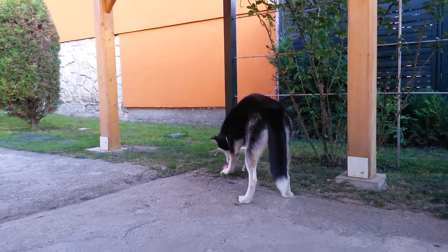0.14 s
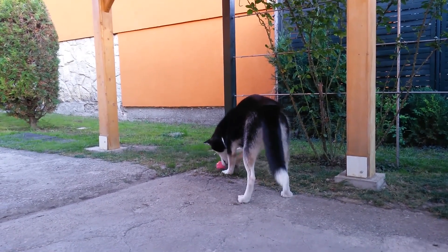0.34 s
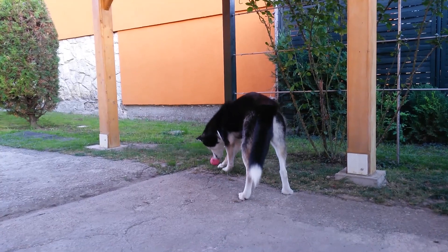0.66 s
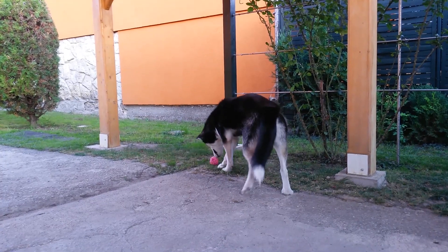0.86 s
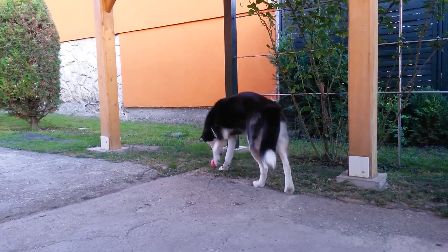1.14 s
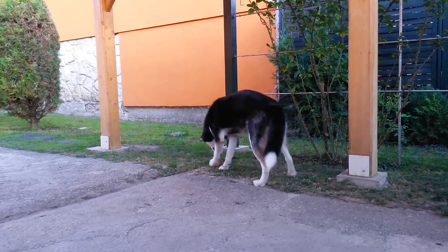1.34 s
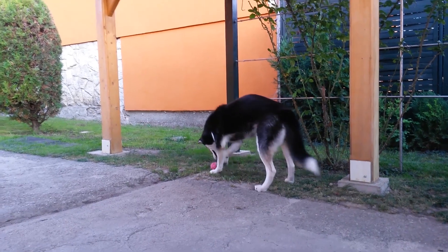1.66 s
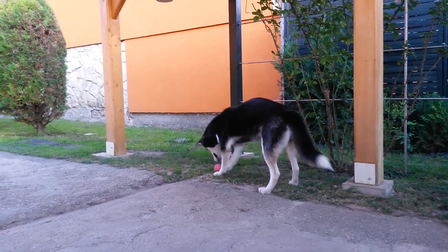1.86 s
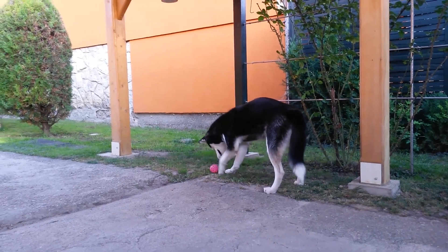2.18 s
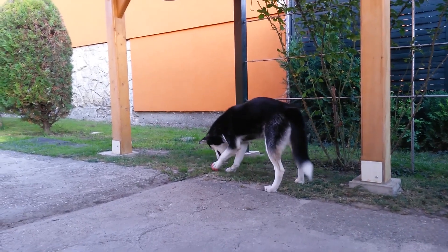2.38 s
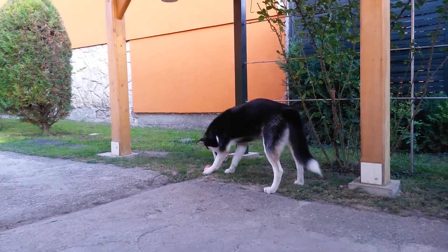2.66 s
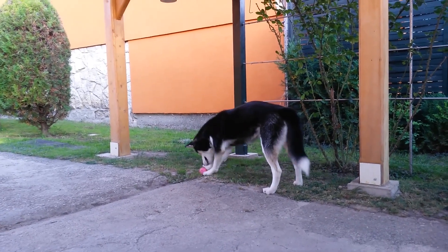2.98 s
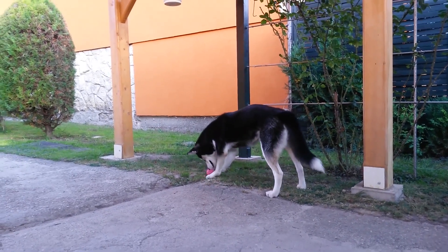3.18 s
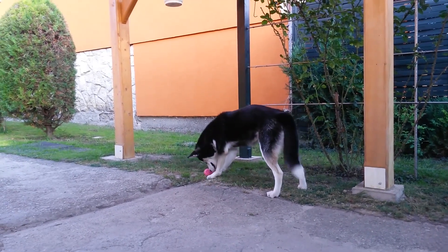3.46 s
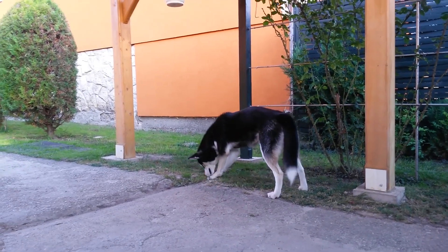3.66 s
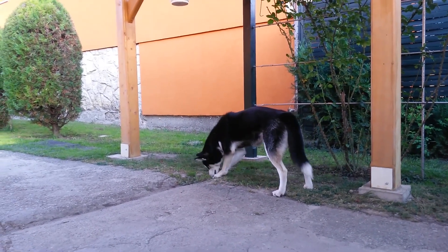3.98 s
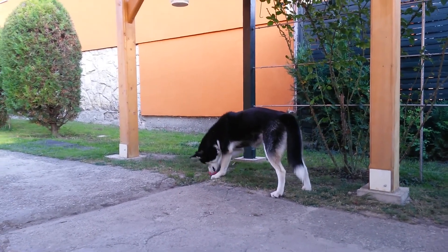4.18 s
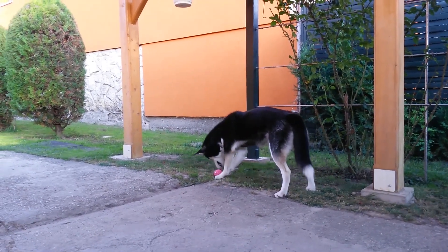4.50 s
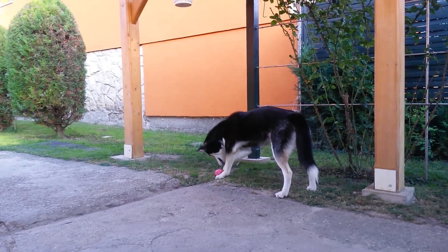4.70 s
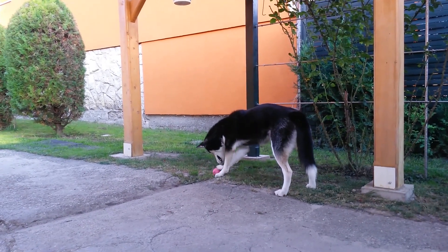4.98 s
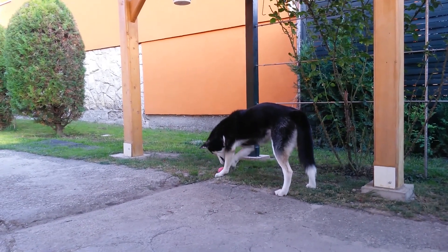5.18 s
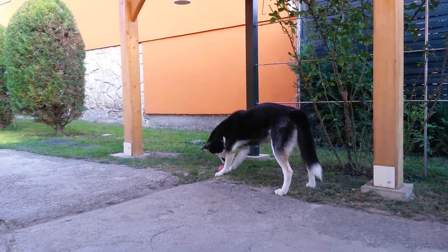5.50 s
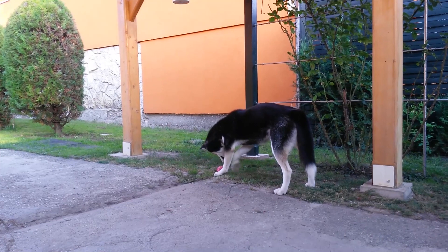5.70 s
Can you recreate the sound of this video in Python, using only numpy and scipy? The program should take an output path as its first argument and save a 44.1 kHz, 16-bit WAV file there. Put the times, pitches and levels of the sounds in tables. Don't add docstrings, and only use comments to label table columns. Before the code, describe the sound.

A hollow plastic ball clicks, scuffs and rattles on concrete under a carport while a car fades away and one loud pop hits the right side.

```python
import sys
import numpy as np
from scipy import signal
from scipy.fft import rfft, irfft, next_fast_len
from scipy.io import wavfile
from scipy.ndimage import uniform_filter1d, map_coordinates

SR = 44100
rng = np.random.default_rng(int(sys.argv[2]) if len(sys.argv) > 2 else 0)


def inscribe(sig):
    pcm = np.round(np.clip(np.atleast_2d(sig).T, -1, 1) * 32767)
    wavfile.write(sys.argv[1], SR, pcm.astype(np.int16))


def ratio_of_db(decibels):
    return 10 ** (np.asarray(decibels, float) / 20)


N = 257984

LEAD_S = 0.0002482
RIM_HZ = 6680


def unit(x):
    return x / np.sqrt(np.mean(x ** 2) + 1e-20)


def along(points, hz):
    f, v = np.transpose(points)
    return np.interp(np.log(hz + 1), np.log(f + 1), v)


def curves(rows):
    s, *cols = np.transpose(rows)
    return [np.interp(np.arange(N) / SR, s, c) for c in cols]


def wobble(rate):
    knots = rng.standard_normal(int(N * rate / SR) + 4)
    return map_coordinates(knots, [np.arange(N) * rate / SR])


def filtered(x, response):
    m = next_fast_len(x.shape[-1] + 8192)
    spectrum = rfft(x, m) * response(np.fft.rfftfreq(m, 1 / SR))
    return irfft(spectrum, m)[..., :x.shape[-1]]


def add(track, s, piece):
    part = track[round(s * SR):][:len(piece)]
    part += piece[:len(part)]


def modes(table):
    def response(f):
        total = 0
        for k, (c, w, db) in enumerate(table):
            total = total + (-1) ** k * ratio_of_db(db) * 1j * f * w / (c * c - f * f + 1j * f * w)
        return total
    return response


def lead(f):
    return np.exp(1j * np.pi * f * LEAD_S * np.array([[1], [-1]]))


def gravel(count, spiky_db):
    size = np.minimum(rng.exponential(size=count), 5.5)
    return unit(rng.standard_normal(count) * ratio_of_db(spiky_db * size))


def swell(length):
    count = round(max(length, .003) * SR)
    return np.pad(np.hanning(count) ** 0.094, (0, SR // 20))


def rush(spectrum, patchy_db):
    # f/Hz, likeness [0 to 1]
    alike = [(100, 0.98), (350, 0.98), (700, 1), (1500, 0.17), (3000, 0.31), (8000, .12)]
    z = signal.stft(rng.standard_normal((2, N)), nperseg=512)[2]
    field = uniform_filter1d(rng.standard_normal(z.shape[1:]), size=5, axis=0)
    field = uniform_filter1d(field, size=10, axis=1)
    pair = signal.istft(z * ratio_of_db(patchy_db * unit(field)), nperseg=512)[1][:, :N]

    def mid_side(hz):
        turn = np.arccos(np.clip(along(alike, hz), -1, 1)) / 2
        colour = ratio_of_db(along([(0.87, -120)] + spectrum + [(22000, -120)], hz))
        return colour * np.array([np.cos(turn), np.sin(turn)])

    mid, side = filtered(pair, mid_side)
    return unit(filtered(np.array([mid + side, mid - side]), lead))


def road():
    # t/s, level/dB re the start
    traffic = [(0, -0.5), (.35, -5), (.75, -6.5), (1.3, -13.5), (1.9, -16.5), (2.3, -19.5), (2.75, -29.5),
               (3.3, -26.5), (4, -31), (5, -28), (5.25, -19.5), (5.5, -26), (5.85, -20)]
    # f/Hz, level/dB per Hz
    hum_colour = [(15, -36), (28, -10), (45, -2), (100, 7.5), (130, -14), (200, -30.5)]
    engine_colour = [(30, -24), (60, -9), (100, -4), (135, -0.5), (190, -5.5), (265, -6.5), (340, -11.5),
                     (450, -53.5)]
    tyre_colour = [(250, -13), (400, -7), (520, -3.5), (780, -5.5), (1050, -0.5), (1500, -6), (2200, -8.5),
                   (3200, -26)]
    spray_colour = [(1800, -21.5), (2800, -3.5), (5000, -8.5), (6800, -5), (8500, -8.5), (11000, -21),
                    (13000, -80.5)]
    # t/s, f/Hz, level/dB
    whine_path = [(3.85, 2150, -96), (3.97, 2160, -77), (4.1, 2130, -83), (4.2, 2200, -77),
                  (4.38, 2140, -80.5), (4.5, 2090, -106.5)]
    loud_db, = curves(traffic)
    engine_db = -42 + 0.8 * loud_db
    tyre_db = -35.5 + loud_db
    spray_db = -54.5 + 0.84 * loud_db
    flutter = wobble(2.3)
    engine = ratio_of_db(engine_db + wobble(14)) * rush(engine_colour, patchy_db=-0.5)
    tyres = ratio_of_db(tyre_db + 0.26 * flutter) * rush(tyre_colour, patchy_db=1.0)
    spray = ratio_of_db(spray_db + 7.0 + 0.26 * flutter) * rush(spray_colour, patchy_db=2.7)
    hz, db = curves(whine_path)
    phase = 2 * np.pi * np.cumsum(hz + 12 * wobble(40)) / SR
    whine = ratio_of_db(db + 3.0 * wobble(30.2)) * np.sin(phase)
    hum = ratio_of_db(-66.0 + wobble(3.9)) * rush(hum_colour, patchy_db=1)
    return hum + engine + tyres + spray + whine * (db > -94)


def pop():
    # t/s, level/dB
    jumps = [
        (2.40559, -1),
        (2.40601, -16.5),
    ]
    lead_in_s = .0045
    steps = np.zeros(N)
    for s, db in jumps:
        steps[round(s * SR)] = ratio_of_db(db)
    cut_hz, damping, leak_hz = 100, 1.3, 14

    def drained(f):
        return 1j * f * SR / (2 * np.pi) / (cut_hz ** 2 - f * f + 1j * f * cut_hz * damping)

    def edges(f):
        return 1j * f / (leak_hz + 1j * f) / (1 + (f / 13500) ** 12)

    right = filtered(steps, lambda f: drained(f) * edges(f))
    add(right, jumps[0][0] - lead_in_s, ratio_of_db(-44) * rng.standard_normal(round(lead_in_s * SR)))
    return np.array([np.zeros(N), right])


def body(x):
    t = np.arange(SR // 200) / SR
    burst = rng.standard_normal((2, len(t))) * np.exp(-t / 0.00046)
    scatter = filtered(burst, lambda f: (1j * f / (2360 + 1j * f)) ** 2)
    scatter = ratio_of_db(-4) * scatter / np.linalg.norm(scatter, axis=1, keepdims=True)
    return x + signal.fftconvolve(x, scatter, axes=1)[:, :x.shape[1]]


def scattered():
    # f/Hz, t60/s
    decay = [(400, .24), (1100, .3), (2800, .31), (7300, .28), (12000, .16)]
    count = SR * 2 // 5
    grains = np.array([gravel(count, spiky_db=3.5), gravel(count, spiky_db=3.5)])
    hz, t, z = signal.stft(grains, SR, nperseg=256)
    tail = signal.istft(z * ratio_of_db(-60 * t / along(decay, hz)[:, None]), SR, nperseg=256)[1]
    tail = tail * (1 - np.exp(-(np.arange(tail.shape[1]) / SR / .008) ** 2))
    return tail / np.linalg.norm(tail, axis=1, keepdims=True)


def carport(x):
    # delay t/s, left level/dB, right level/dB
    bounces = [
        (.0065, -12, -15),
        (.0092, -13, -8),
        (.0158, -1, 2),
        (.0215, -9, -11),
        (.0295, -11, -11),
    ]
    ball_lead_s = .00009
    echo_hz = 1470
    open_hz = 485
    echoes = np.zeros((2, N))
    for s, left_db, right_db in bounces:
        delay = round(s * SR)
        echoes[:, delay:] += ratio_of_db([[left_db], [right_db]]) * x[:-delay]
    direct = filtered(np.array([x, x]), lambda f: lead(f) ** (ball_lead_s / LEAD_S))
    echoes = filtered(echoes, lambda f: lead(f) * 1j * f / (echo_hz + 1j * f))
    near = ratio_of_db(-4) * direct + ratio_of_db(-3.5) * echoes
    kept = filtered(x, lambda f: 1j * f / (open_hz + 1j * f))
    out = np.zeros((2, N))
    for start in range(0, N, SR // 4):
        span = slice(start, start + SR // 4)
        wet = signal.fftconvolve(kept[None, span], scattered(), axes=1)
        add(out.T, start / SR, wet.T)
        padded = np.pad(near[:, span], ((0, 0), (0, SR // 200)))
        add(out.T, start / SR, body(padded).T)
    return out


def hollow():
    # t/s, length/s, f/Hz, level/dB
    hoots = [(.61, 0.018, 644, -54), (1.557, 0.0304, 593, -53.5), (2.01, 0.033, 582, -60.5),
             (3.347, 0.062, 597, -64), (4.563, 0.051, 402, -58), (4.981, 0.04, 590, -72),
             (5.144, 0.0296, 580, -61), (5.193, 0.029, 545, -56.5), (5.34, 0.03, 593, -62.5),
             (5.539, 0.023, 503, -60.5), (5.591, 0.022, 640, -60)]
    out = np.zeros(N)
    for s, length, hz, db in hoots:
        stroke = swell(length)
        bumps = gravel(SR // 4, spiky_db=2.5)[:len(stroke)]
        narrow, wide = modes([(hz, 170, -2)]), modes([(hz, 420, -2)])
        add(out, s, ratio_of_db(db + 36) * filtered(stroke * bumps, lambda f: narrow(f) * wide(f)))
    return out


def rings():
    # t/s, length/s, f/Hz, level/dB
    squeaks = [(0.783, 0.012, 2950, -48.5), (0.783, 0.0076, 7260, -46), (1.968, 0.063, 7240, -60),
               (2.52, 0.021, 3000, -68), (0.298, 0.004, 2980, -41), (3.34, 0.022, 1190, -59),
               (4.44, 0.016, 2900, -50.5), (4.573, 0.021, 5610, -42.5), (4.574, 0.015, 2920, -47),
               (4.985, 0.018, 6240, -53), (4.993, 0.015, 2100, -66), (5.196, 0.017, 2000, -43),
               (5.485, 0.0065, 1740, -63), (5.586, 0.012, 1640, -50.5), (5.634, 0.024, 2830, -56)]
    out = np.zeros(N)
    for s, length, hz, db in squeaks:
        stroke = swell(length)
        mode = modes([(hz, 0.13 * hz, 0)])
        grit = gravel(SR // 4, spiky_db=0.0)[:len(stroke)]
        tone = unit(filtered(grit, lambda f: mode(f) ** 2))
        add(out, s, ratio_of_db(db + 4) * filtered(stroke * tone, modes([(hz, 0.3 * hz, 0)])))
    return out


def thuds():
    # t/s, f/Hz, peak level/dB
    taps = [
        (1.5395, 1030, -36),
        (3.0355, 1080, -41),
        (5.3485, 1130, -29.5),
        (5.3495, 1680, -35),
        (5.3489, 2420, -41),
        (.786, 1750, -30),
        (4.577, 2034, -28),
        (4.578, 1140, -32),
        (5.4915, 1720, -36),
        (5.765, 1050, -33.5),
    ]
    out, t = np.zeros(N), np.arange(SR // 40) / SR
    for s, hz, db in taps:
        add(out, s, ratio_of_db(db) * np.exp(-t * hz / 1.79) * np.sin(2 * np.pi * hz * t))
    return out


def plastic(force, rim_db, knock_db, shell_hz, rim_hz):
    # f/Hz, width/Hz, level/dB
    wall_modes = [(1050, 305, -2), (1793, 190, 7.5), (2150, 2100, 3)]
    shell_modes = [(2860, 720, -2), (3780, 860, -7.5), (4430, 550, -4.5)]
    rim_modes = [(6130, 1330, -8), (7830, 1660, -5), (9750, 2960, -7.5)]

    def grip(table, db):
        return [(hz * rng.uniform(.97, 1.03), w, level + db + rng.normal(0, 1)) for hz, w, level in table]

    wall = modes(grip(wall_modes, knock_db) + grip(shell_modes, 0) + grip(rim_modes, rim_db))
    free_shell, free_rim = modes([(shell_hz, 700, 3)]), modes([(rim_hz, 600, 3)])

    def response(f):
        soft = 1 / (1 + 1j * f / 11000) ** 5
        return wall(f) * (1 + free_shell(f)) * (1 + free_rim(f)) * soft

    return filtered(force, response)


def scuffs():
    # t/s, length/s, shell level/dB, rim level/dB re shell
    drags = [(0.277, 0.067, -56.5, 19.5), (0.367, 0.062, -51, 12.5), (0.626, 0.029, -38.5, 7.5),
             (0.969, 0.12, -59, 8), (1.119, 0.049, -55.5, 9), (1.321, 0.055, -66, 1),
             (1.425, .032, -46, 3.5), (1.563, 0.071, -53, 18), (1.916, .09, -51, 3),
             (2.175, 0.037, -57, -10.5), (2.489, 0.025, -54.5, 6), (2.74, 0.02, -62, 14.5),
             (3.114, 0.018, -53, 1.5), (3.296, 0.08, -59, 7), (3.61, 0.067, -78.5, 6),
             (4.371, 0.046, -61.5, 3), (4.469, .091, -55, 3), (4.607, 0.1, -65, 10), (4.862, 0.1, -60, 4),
             (5.009, 0.064, -58, 4), (5.173, 0.052, -43, 4), (5.251, .08, -65, 11), (5.485, 0.043, -45, 6),
             (5.564, 0.081, -52.5, 7.5), (5.77, 0.04, -59.5, 14.5)]
    out = np.zeros(N)
    for s, length, db, rim_db in drags:
        stroke = swell(length)
        grit = gravel(SR // 4, spiky_db=5.5)[:len(stroke)]
        knock_db = -6 - 0.2 * (db + 62)
        add(out, s, ratio_of_db(db + 10.5) * plastic(stroke * grit, rim_db, knock_db, shell_hz=2960, rim_hz=RIM_HZ))
    return out


def clicks():
    # t/s, shell level/dB, rim level/dB re shell, free shell mode f/Hz
    hits = [(0.7838, -18, -9, 2820), (1.4267, -32, -6, 4000), (1.5376, -27.5, -0.5, 4260),
            (1.5526, -7.5, -2.5, 3780), (1.554, -13.5, -8, 3830), (2.0122, -19, -4.5, 3960),
            (2.494, -39.5, -7.5, 3780), (2.6397, -40, -7, 3040), (3.036, -35.5, -6, 3800),
            (3.1331, -28.5, -4.5, 4400), (3.268, -28.5, -7.5, 3940), (3.728, -44.5, -10, 2980),
            (3.8345, -49.5, -10.5, 2750), (4.384, -53.5, -8, 4050), (4.4432, -35.5, -6.5, 3500),
            (4.5222, -47, -7, 2710), (4.5758, -23, -38, 3100), (4.8705, -45, -1, 4200),
            (4.9879, -32.5, -6.5, 3530), (5.1448, -38, -9, 3470), (5.1575, -30.5, -8, 3150),
            (5.2047, -16, -5.5, 2700), (5.3486, -29.5, -2.5, 2730), (5.4922, -27.5, -18, 3250),
            (5.5824, -30, -15, 3500), (5.6031, -30, 0, 4030), (5.7657, -26.5, -13, 3100),
            (5.8424, -21.5, -10.5, 4060)]
    # t/s, level/dB
    catches = [
        (.601, -28),
        (1.8911, -49),
        (2.187, -46.5),
        (2.208, -43),
        (2.7495, -62),
        (3.3987, -47.5),
    ]
    usual_db, settle_s = -32.5, .004
    out, t = np.zeros(N), np.arange(SR // 16) / SR
    blows = [(s, db, rim_db, -18 - 0.22 * (db - usual_db), hz) for s, db, rim_db, hz in hits]
    ticks = [(s, db, 9, -13, 3330) for s, db in catches]
    for s, db, rim_db, knock_db, shell_hz in blows + ticks:
        force = ratio_of_db(-18.0) * gravel(len(t), spiky_db=2) * np.exp(-t / settle_s)
        force[0] = ratio_of_db(-3 + 0.1535 * (db - usual_db))
        rim_hz = RIM_HZ * (1 + .03 * rng.standard_normal())
        add(out, s, ratio_of_db(db + 23.5) * plastic(force, rim_db + 7.5, knock_db + 8, shell_hz, rim_hz))
    return out


def scene():
    # f/Hz, left minus right level/dB
    balance = [(300, .5), (700, 0.5), (1400, -3), (2500, -1.5), (4400, -4.5), (8000, -0.8), (14000, 11.5)]
    ball = clicks() + scuffs() + hollow() + rings() + thuds()
    air = carport(ball) + road()
    return filtered(air, lambda f: ratio_of_db(along(balance, f) / 2 * np.array([[1], [-1]])))


def band_limit(x):
    return signal.sosfilt(signal.butter(12, 15920, fs=SR, output="sos"), x)


def record(dry):
    # f/Hz, level/dB per Hz
    hiss_colour = [(1500, -39), (4000, -8), (9000, -5), (14000, -1.5)]
    hiss = filtered(rng.standard_normal((2, N)), lambda f: ratio_of_db(along(hiss_colour, f)))
    wet = filtered(dry + ratio_of_db(-65) * hiss, lambda f: f < 14600)
    return band_limit(wet + pop())


dry = scene()
out = record(dry)
inscribe(out)
```